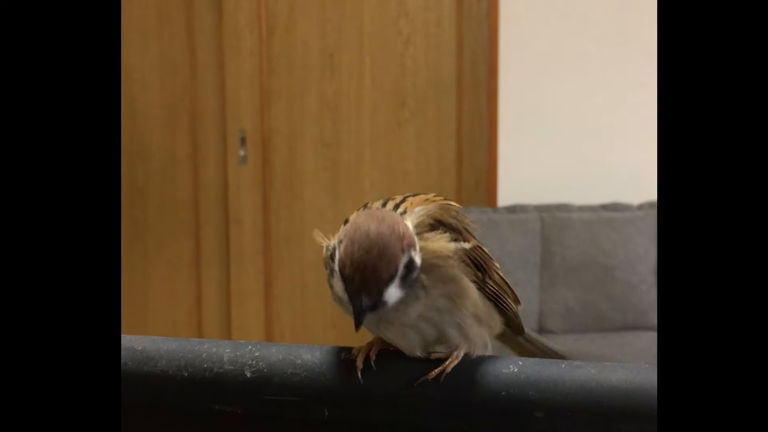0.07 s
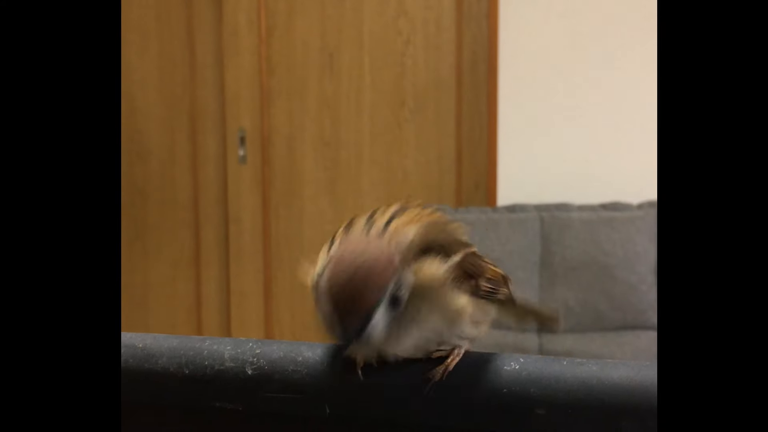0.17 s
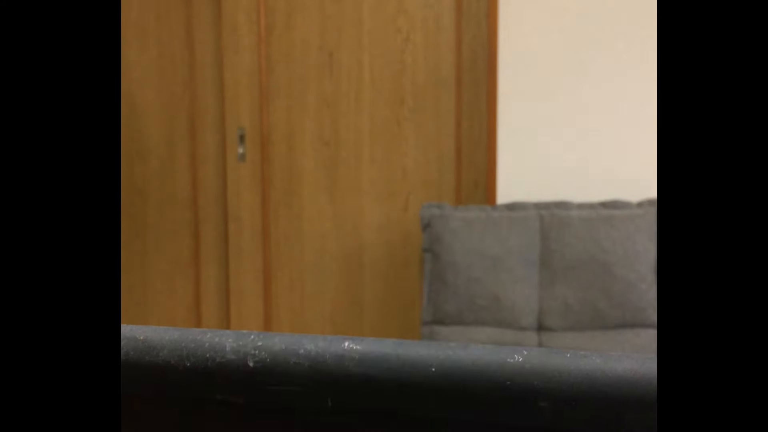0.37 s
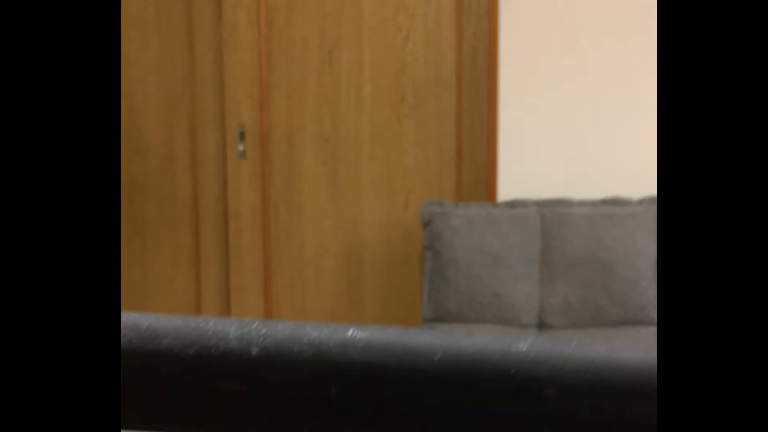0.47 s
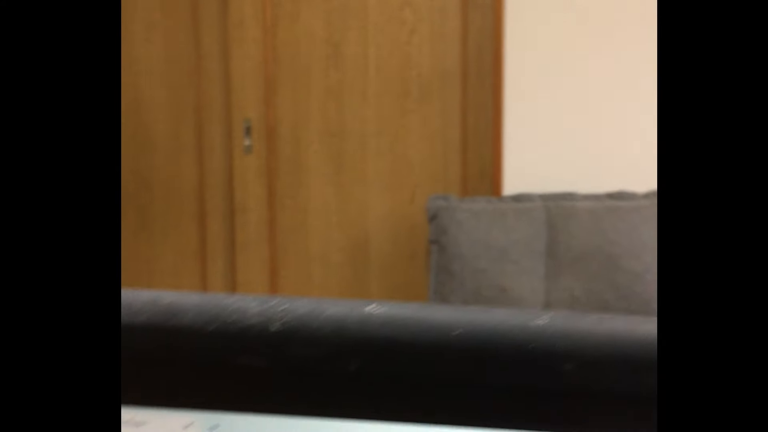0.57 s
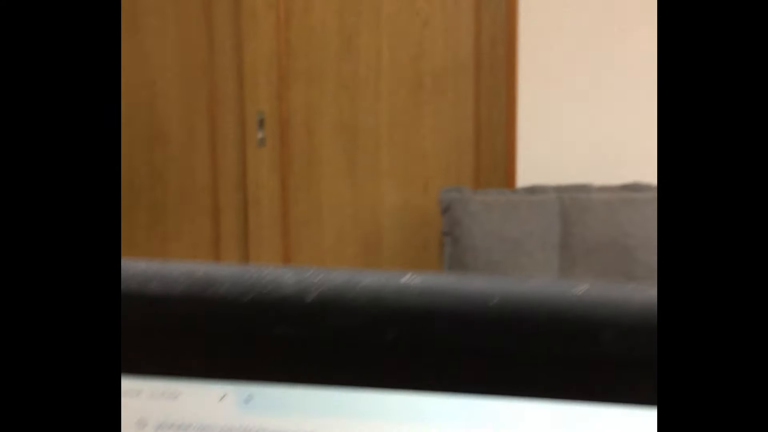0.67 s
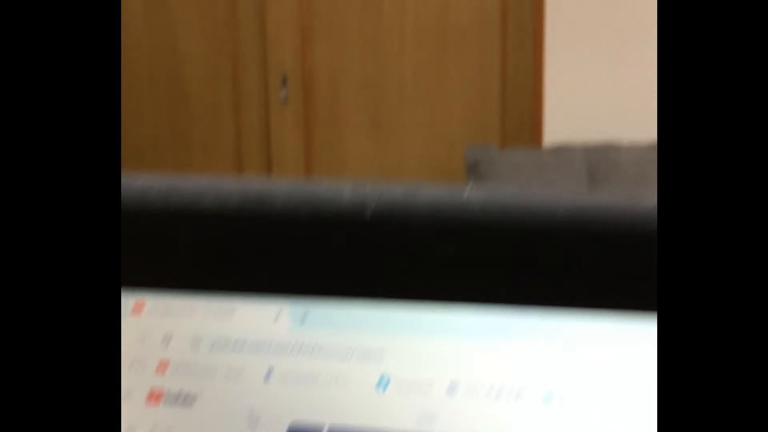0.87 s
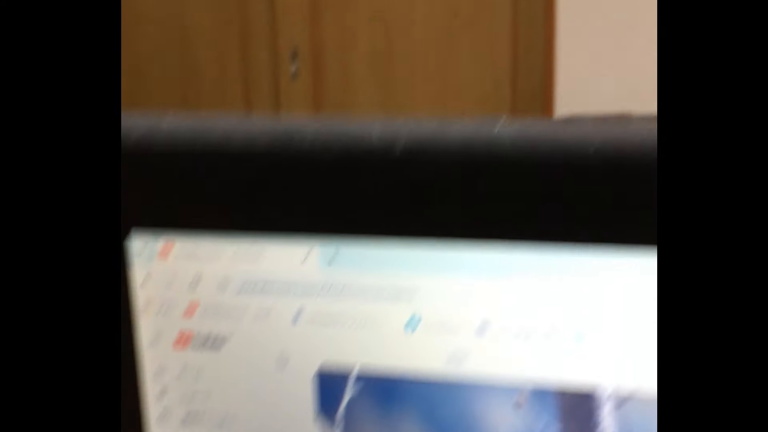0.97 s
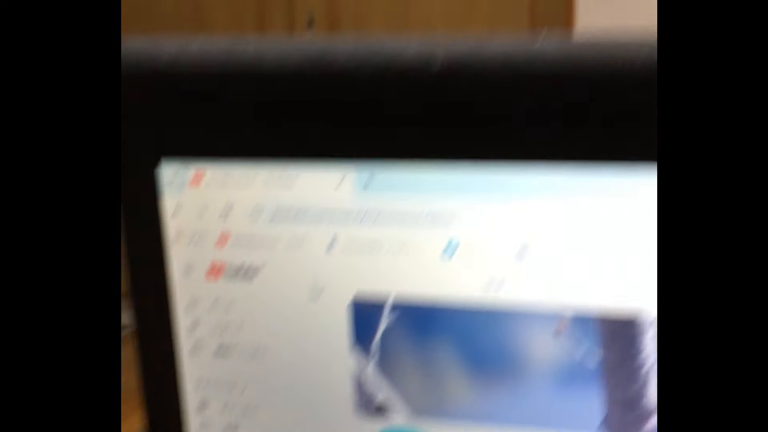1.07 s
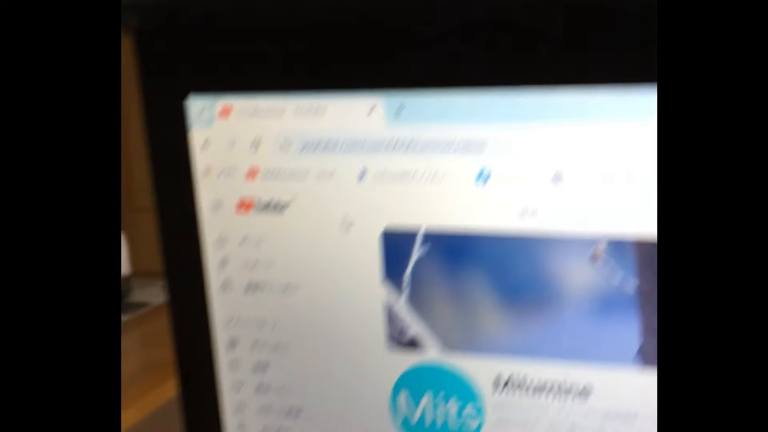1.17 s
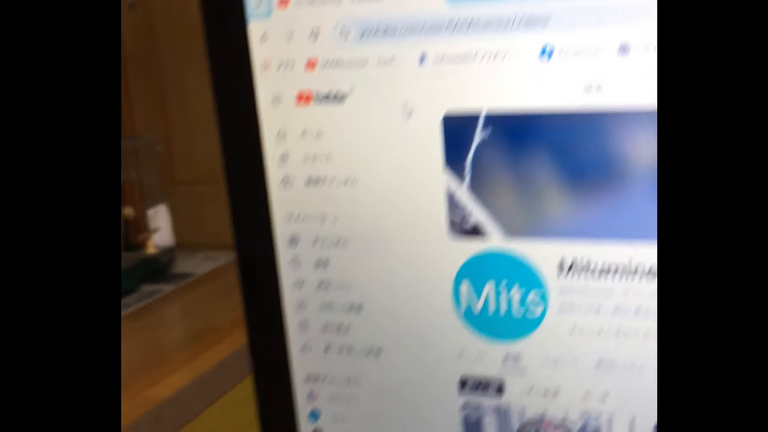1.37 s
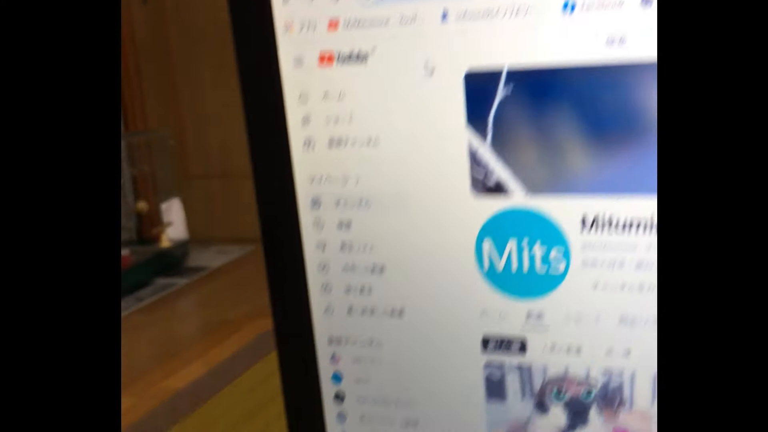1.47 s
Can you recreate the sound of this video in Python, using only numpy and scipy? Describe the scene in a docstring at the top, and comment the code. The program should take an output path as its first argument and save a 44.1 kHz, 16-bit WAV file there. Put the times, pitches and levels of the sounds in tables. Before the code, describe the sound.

A small bird's claws tick and scrape on plastic, then it flutters and lands with a clack.

```python
"""A small quiet room, with a low murmur of air and a soft handling rumble at the microphone.
Close by, a small bird shuffles on a hard plastic edge: its claws stick and slip, so the edge ticks,
scrapes and gives a last skid as the bird jumps. Feathers swish and a wingbeat puffs at the microphone.
A little farther off it lands on a hard panel with a sharp clack and taps three more times.
The room answers claws and knocks with a short echo."""
import sys
import numpy as np
from scipy import signal
from scipy.fft import rfft, irfft, next_fast_len
from scipy.io import wavfile

SR = 44100
rng = np.random.default_rng(int(sys.argv[2]) if len(sys.argv) > 2 else 0)


def transcribe(u):
    """Save the signal u as a 16-bit wav file named by the first command-line argument.

    u: samples, shape (n,) or (channels, n), limited to [-1, 1]; the rate is SR.
    q: integer samples, one column per channel.
    """
    v = np.clip(np.atleast_2d(u).T, -1, 1)
    q = np.round(v * 32767).astype(np.int16)
    wavfile.write(sys.argv[1], SR, q)


N = 66150
T = np.arange(N) / SR
N_FFT = next_fast_len(N + SR // 2)
HZ = np.fft.rfftfreq(N_FFT, 1 / SR)


def amp(db):
    """Decibels to gain."""
    return 10 ** (np.asarray(db) / 20)


def unit(x):
    """Scaled to rms 1."""
    return x / np.sqrt(np.mean(x ** 2) + 1e-20)


def along(points, hz):
    """A curve through (f/Hz, value) points on a log frequency axis."""
    f, values = np.transpose(points)
    return np.interp(np.log(hz + 1), np.log(f + 1), values)


def level(points):
    """Gain per sample from (t/s, level/dB) points, silent outside them."""
    return amp(np.interp(T, *np.transpose(points), left=-150, right=-150))


def swell(middle_s, half_s):
    """A bell-shaped envelope."""
    return np.exp(-((T - middle_s) / half_s) ** 2)


def filtered(x, response):
    """x through a response scaled to unit power."""
    return irfft(rfft(x, N_FFT) * response / np.sqrt(np.mean(abs(response) ** 2)), N_FFT)[:N]


def noise(response):
    """Coloured noise of rms 1."""
    return unit(filtered(rng.standard_normal(N), response))


def causal(db):
    """A minimum-phase response with the given gain in dB."""
    cepstrum = irfft(np.log(amp(db)), N_FFT)
    cepstrum[1:N_FFT // 2] *= 2
    cepstrum[N_FFT // 2 + 1:] = 0
    return np.exp(rfft(cepstrum))


def resonances(modes):
    """Summed response of (f/Hz, width/Hz, level/dB) modes."""
    return sum(amp(db) * 1j * HZ * width / (f * f - HZ ** 2 + 1j * HZ * width) for f, width, db in modes)


def body(colour, modes):
    """A broad colour with ringing modes standing on it."""
    broad = causal(along(colour, HZ))
    return broad + resonances(modes) * broad / abs(broad)


def slips(per_s=7000, scatter_db=3):
    """Tiny stick-slip impulses of uneven size over a faint hiss, rms 1."""
    happens = rng.random(N) < per_s / SR
    direction = np.sign(rng.standard_normal(N))
    size = amp(scatter_db * rng.standard_normal(N))
    return unit(happens * direction * size + 0.21 * rng.standard_normal(N))


def contact(envelope, response):
    """Slips under an envelope ring a body; the envelope sets the energy."""
    ring = filtered(slips() * envelope, response)
    return ring * np.linalg.norm(envelope) / (np.linalg.norm(ring) + 1e-12)


def thud(start_s, hz, db, t60_s, rise_s):
    """One low damped swing."""
    age = np.maximum(T - start_s, 0)
    return amp(db - 60 * age / t60_s) * np.sin(2 * np.pi * hz * age) * (1 - np.exp(-age / rise_s))


# spectrum of the air in the room (f/Hz, relative level/dB)
AIR_COLOUR = [(20, -40), (50, -13), (76, -17.5), (108, 1.5), (135, -8.5), (240, -3), (330, -8.5),
              (430, -16.5), (540, -16), (760, -11), (1260, -21), (1900, -27), (3000, -31.5), (4500, -35),
              (7500, -34), (9600, -30), (12000, -30.5), (16000, -31.5)]
# low room modes, for one pass through them (f/Hz, width/Hz, relative level/dB)
ROOM_MODES = [(108, 32, 4.5), (226, 12.3, 7), (277, 43, 0.5)]
def room_tone(air_db=-62.5, modes_db=-67.5):
    """Air murmurs all around the microphone; noise passed twice through the low modes adds a drone."""
    air = amp(air_db) * noise(amp(along(AIR_COLOUR, HZ)))
    return air + amp(modes_db) * noise(resonances(ROOM_MODES) ** 2)


# course of the handling rumble (t/s, level/dB)
RUMBLE_LEVEL = [(0, -73), (.33, -75), (.45, -67), (.55, -58.5), (.68, -70.5), (.82, -60.5), (.95, -62),
                (1.2, -76), (1.5, -79)]
# its spectrum (f/Hz, relative level/dB)
RUMBLE_COLOUR = [(20, -38), (35, -3.5), (48, -3.5), (65, -3.5), (100, -6.5), (200, -19.5), (600, -63)]
def handling_rumble():
    """Right at the microphone, a soft rumble swells twice as it is turned."""
    return level(RUMBLE_LEVEL) * noise(amp(along(RUMBLE_COLOUR, HZ)))


# reverberation time of the small room (f/Hz, t60/s)
ROOM_DECAY = [(200, 0.18), (2000, 0.38), (6000, 0.38), (14000, 0.23)]
def reverberation(x, delay_s=0.0027, frame=128):
    """Each band stores the energy that reaches it and leaks it as diffuse noise, longest at 2-6 kHz."""
    hz, t, (source, diffuse) = signal.stft(np.array([x, rng.standard_normal(N)]), SR, nperseg=frame)
    onset = np.clip(t / delay_s - 1, 0, 1)
    decay = amp(-60 * t / along(ROOM_DECAY, hz)[:, None]) ** 2 * onset
    decay /= decay.sum(1, keepdims=True)
    stored = signal.fftconvolve(abs(source) ** 2, decay, axes=1)[:, :len(t)]
    return signal.istft(np.sqrt(abs(stored)) * diffuse / np.std(diffuse), SR, nperseg=frame)[1][:N]


# colour the room gives its echo (f/Hz, relative level/dB)
ECHO_COLOUR = [(250, 6), (1000, -1.5), (1750, 3.5), (2500, -6.5), (4000, 0), (6000, -5.5), (9000, -4.5),
               (15000, -5)]
def room_echo(near, far, near_send_db=-15, far_send_db=-13.5):
    """The room answers both sources, the farther one a little more."""
    echo = amp(near_send_db) * reverberation(near) + amp(far_send_db) * reverberation(far)
    return filtered(echo, causal(along(ECHO_COLOUR, HZ)))


# feather swishes (middle t/s, half length/s, level/dB)
SWISHES = [(0.376, 0.013, -57), (0.434, 0.031, -53)]
# spectrum of the feathers (f/Hz, relative level/dB)
FEATHER_COLOUR = [(200, -3), (1000, -5.5), (2500, -12.5), (5000, -9), (9000, -5), (12000, -2), (16000, -1)]
def wings():
    """Feathers swish and push a puff of air at the microphone."""
    strokes = sum(amp(db) * swell(s, half) for s, half, db in SWISHES)
    swish = strokes * noise(amp(along(FEATHER_COLOUR, HZ)))
    puff = thud(start_s=0.427, hz=65.4, db=-36.5, t60_s=0.071, rise_s=0.0046)
    return swish + puff


# broad spectrum of a claw on plastic (f/Hz, relative level/dB)
CLAW_COLOUR = [(300, -30), (1500, -28.5), (3500, -23.5), (5100, -28), (6200, -17), (8300, -14),
               (10000, -6.5), (12000, -0.5), (14000, -1.5), (16000, -15)]
# ringing of the plastic edge (f/Hz, width/Hz, relative level/dB)
EDGE_MODES = [(5900, 82, -16), (6267, 180, -15.5), (7880, 74, -12.5), (9800, 110, -15), (10880, 220, 1.5),
              (11640, 140, -8), (12540, 180, -4.5), (13350, 130, -8), (15400, 390, -5.5)]
# claw ticks (t/s, level/dB, tilt above 6 kHz/dB per octave)
TICKS = [(0.029, -45, -11.5), (0.0327, -36, 15), (0.05, -28.5, 11.5), (0.0523, -33.5, -1.5),
         (0.062, -42.5, -7), (0.0605, -45.5, -8.5), (.069, -48, 3), (0.0727, -40, -2), (0.075, -51, -2),
         (0.0848, -49, -2), (0.1738, -43.5, 3), (0.1864, -31, 6.5), (.1976, -47, 4), (0.207, -39.5, 5),
         (0.2128, -37, -9), (0.2123, -26.5, 6), (.221, -39, 10), (0.241, -62, 16), (0.2461, -32.5, 4),
         (0.2959, -26.5, 1), (.298, -21.5, -4), (0.3046, -32, -1), (0.3223, -28, 8)]
# short claw scrapes (middle t/s, half length/s, level/dB)
SCRAPES = [(0.051, 0.0024, -50), (.131, 0.0016, -61), (0.2043, 0.0028, -43.5), (.213, 0.0033, -40),
           (0.241, 0.0043, -48.5), (0.248, 0.00097, -52), (.255, 0.0025, -42.5), (0.325, 0.0011, -42)]
# the edge flexes as the foot pushes off (middle t/s, half length/s, level/dB, centre f/Hz)
FLEXES = [(0.213, 0.0025, -46, 8100), (0.256, 0.0059, -62.5, 1530), (0.2956, 0.0023, -40, 7260),
          (0.303, 0.013, -55.5, 2440), (.306, 0.0065, -60, 1030)]
# the skid of the take-off (t/s, level/dB)
SKID = [(.259, -57), (.264, -47), (.276, -45), (.283, -35), (.292, -28.5), (.3008, -30), (.3022, -43),
        (.307, -57), (.312, -73)]
def claws(tick_decay_s=0.00037, flex_half_width_octaves=0.48):
    """Close to the microphone, ticks, scrapes and a last skid ring one plastic edge, which also flexes."""
    edge = body(CLAW_COLOUR, EDGE_MODES)
    log_tilt = np.log(causal(np.log2(np.maximum(HZ, 6000) / 12000)))  # 1 dB per octave
    ticks = flex = 0
    for s, db, tilt in TICKS:
        strike = (T >= s) * np.exp(-abs(T - s) / tick_decay_s)
        ticks += amp(db) * contact(strike, edge * np.exp(tilt * log_tilt))
    scrapes = sum(amp(db) * contact(swell(s, half), edge) for s, half, db in SCRAPES)
    for s, half, db, hz in FLEXES:
        off_centre = np.log2((HZ + 1) / hz) / flex_half_width_octaves
        band = causal(-20 * np.log10(1 + off_centre ** 4))
        flex += amp(db) * contact(swell(s, half), band)
    skid = contact(level(SKID), edge)
    return ticks + scrapes + flex + skid


# ringing of the hard panel (f/Hz, width/Hz, relative level/dB)
PANEL_MODES = [(580, 90, 6), (1094, 150, 1.5), (1860, 110, -40), (2556, 240, 5.5)]
def panel_knock(start_s, length_s, colour, tilt, lift_db=0, release_s=0.00084):
    """A foot chatters on the panel for a few milliseconds; tilt is in dB per octave above 2.5 kHz."""
    press = (T >= start_s) * np.exp(-np.maximum(T - start_s - length_s, 0) / release_s)
    treble_octaves = np.log2(np.maximum(HZ / 2500, 1))
    return contact(press, body(colour, PANEL_MODES) * causal(tilt * treble_octaves + lift_db))


# taps after the landing (t/s, length/s, level/dB, tilt/dB per octave, favoured f/Hz, its lift/dB)
TAPS = [(0.6552, 0.0055, -45.5, 3, 2900, 5), (0.7178, 0.0036, -54.5, 0.5, 2250, 7),
        (0.904, 0.0059, -51.5, 2.5, 1820, 11)]
# broad spectrum of a light tap (f/Hz, relative level/dB)
TAP_COLOUR = [(100, -28), (300, -10), (550, 5), (780, -22), (1080, 5.5), (1350, -11), (2000, 1.5),
              (2500, -3), (3300, -10), (4400, -8), (5600, -8), (8000, -16), (11000, -19.5), (16000, -19)]
def taps(lift_half_width_octaves=0.45):
    """Three lighter touches on the panel, each favouring its own pitch."""
    touches = 0
    for s, length, db, tilt, hz, lift_db in TAPS:
        lift = lift_db * np.exp(-(np.log2((HZ + 1) / hz) / lift_half_width_octaves) ** 2)
        touches += amp(db) * panel_knock(s, length, TAP_COLOUR, tilt, lift)
    return touches


# the two stages of the landing clack (t/s, length/s, level/dB, tilt/dB per octave)
CLACK_STAGES = [(0.4802, 0.0029, -35.5, -4), (0.4828, 0.0062, -29.5, 1.5)]
# broad spectrum of the clack (f/Hz, relative level/dB)
CLACK_COLOUR = [(100, -40), (300, -26), (560, 10.5), (800, -7.5), (1200, -2), (2600, 3), (3300, 1.5),
                (4400, -18.5), (5700, 1), (7700, -14.5), (9100, -4.5), (10600, -15.5), (13800, -2.5),
                (16000, -11.5)]
# low modes of the landing (f/Hz, level/dB, t60/s, rise/s)
THUMP_MODES = [(276.7, -30, 0.054, 0.0064), (529, -35.5, 0.036, 0.00096)]
def landing(thump_start_s=0.4835):
    """A little farther from the microphone, the bird hits the panel: a sharp clack over a low thump."""
    thump = sum(thud(thump_start_s, *mode) for mode in THUMP_MODES)
    clack = sum(amp(db) * panel_knock(s, length, CLACK_COLOUR, tilt)
                for s, length, db, tilt in CLACK_STAGES)
    return thump + clack


def scene():
    """One microphone in the room: claws close by, the landing and taps a little farther off."""
    near = claws()
    far = landing() + taps()
    return (near + far + room_echo(near, far) + wings() + room_tone() + handling_rumble())[None]


def record(dry, low_cut_hz=28.6, top_hz=16050):
    """The microphone rolls off the deep bass and keeps nothing above its band limit."""
    low_cut = signal.butter(2, low_cut_hz, "high", fs=SR, output="sos")
    spectrum = rfft(signal.sosfilt(low_cut, dry), N_FFT)
    return irfft(spectrum * (HZ < top_hz), N_FFT)[..., :N]


dry = scene()
out = record(dry)
transcribe(out)
```